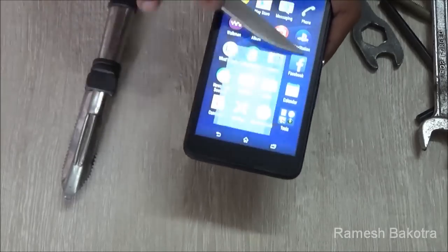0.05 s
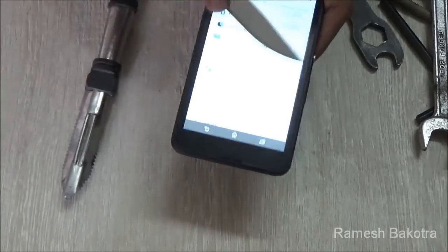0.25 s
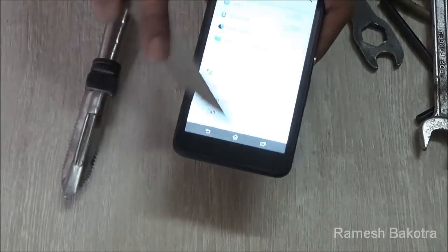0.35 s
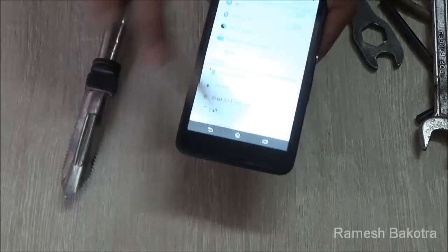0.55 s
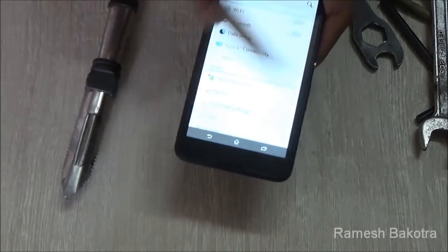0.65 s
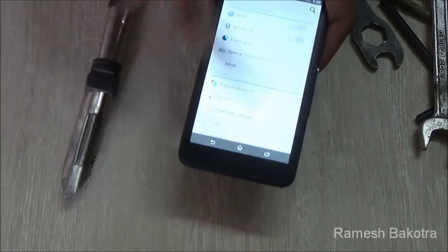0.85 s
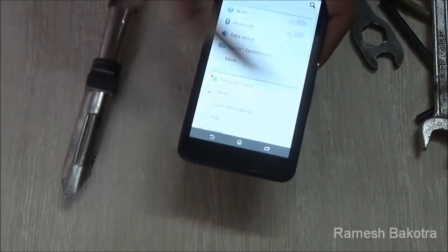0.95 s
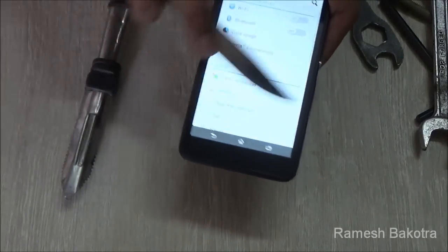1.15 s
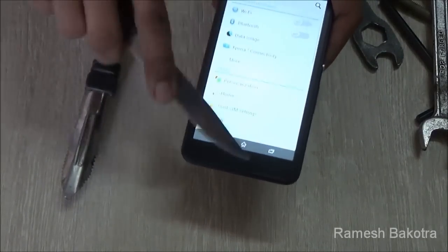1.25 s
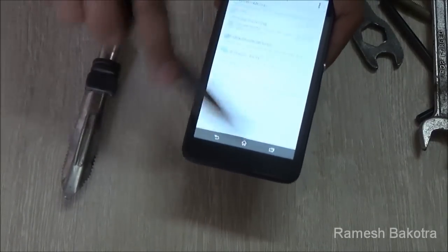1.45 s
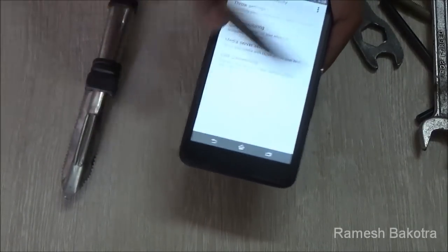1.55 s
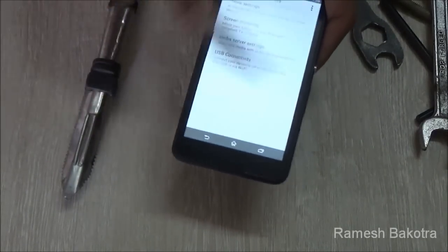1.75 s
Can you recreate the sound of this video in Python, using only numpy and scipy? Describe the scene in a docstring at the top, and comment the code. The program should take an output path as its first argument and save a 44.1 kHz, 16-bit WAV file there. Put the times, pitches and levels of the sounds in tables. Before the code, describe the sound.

A knife tip hits a phone's glass screen once with a sharp click, close to the microphone. Lighter ticks and short scuffs of blade and fingers follow, over soft background noise in a small, hard-walled room.

```python
"""A small hard room: close to the microphone, a knife tip strikes the glass of a hand-held phone once.
The contact cracks and crunches, and phone and blade ring briefly. Lighter ticks and short scuffs of
blade and fingers surround the blow; each has a quick, softer repeat, and the walls add a short tail.
Behind it lie soft room noise, a faint, wavering whine and two low hums that come and go."""
import sys
import numpy as np
from scipy import signal
from scipy.fft import rfft, irfft
from scipy.io import wavfile
from scipy.ndimage import uniform_filter1d

SR = 44100
rng = np.random.default_rng(int(sys.argv[2]) if len(sys.argv) > 2 else 0)


def inscribe(sig):
    """Save sig as 16-bit PCM at rate SR to the path in sys.argv[1].

    A 1-D sig is mono; a 2-D sig holds one channel per row.
    Samples are clipped to [-1, 1] before scaling.
    """
    pcm = np.round(np.clip(np.atleast_2d(sig).T, -1, 1) * 32767)
    wavfile.write(sys.argv[1], SR, pcm.astype(np.int16))


N = 79380

AIR_DB, WHINE_WAVER, HUM_WAVER = -59, 0.00513, 0.013  # wavers are fractions of the pitch
WALL_LAG_S, ROOM_HOLD_S, EARLY_FADE_S = .0098, .035, .005
REPEAT_LAG_S, REPEAT_DB = .0026, -9
SCUFF_GRAIN_DB, HANDLING_DB, HANDLING_SWING_DB = 5.5, -73, 5.5
TICK_RISE_S, TICK_RING_DB, TICK_RING_T60_S = 0.00027, -7.5, 0.021
BLOW_S, BLOW_DB = .2441, -9
CRACK_DB, CRUNCH_DB, CRUNCH_T60_S = 8.5, -16, .014  # crack relative to blow, crunch to crack
RING_SEND_DB, LIGHT_SEND_DB = -11, -11.5  # reverb sends


def undb(db):
    """Decibels to gain."""
    return 10 ** (np.asarray(db) / 20)


def unit(x):
    """Scale to rms 1."""
    return x / np.sqrt(np.mean(x ** 2))


def noise():
    """White noise."""
    return rng.standard_normal(N)


def drift(hz):
    """Smooth random motion with rms 1, mostly slower than hz."""
    width = int(SR / hz)
    smoothed = uniform_filter1d(noise(), width, mode="wrap")
    return unit(uniform_filter1d(smoothed, width, mode="wrap"))


def since(start):
    """Seconds since a moment, zero before it."""
    return np.maximum(np.arange(N) / SR - start, 0)


def decay(t, t60):
    """An envelope that falls 60 dB in t60 seconds."""
    return np.exp(-np.log(1000) * t / t60)


def delay(x, lag):
    """The same sound, lag seconds later."""
    return np.interp(np.arange(N) - round(lag * SR), np.arange(N), x, left=0)


def colour(x, points):
    """Minimum-phase EQ through (Hz, dB) points: nothing rings ahead of an attack."""
    hz, db = np.array(sorted(points), float).T
    freqs = np.maximum(np.arange(N + 1) * SR / (2 * N), 1)
    gain = undb(np.interp(np.log(freqs), np.log(hz), db))
    cepstrum = irfft(np.log(gain))
    cepstrum[1:N] *= 2
    cepstrum[N + 1:] = 0
    return irfft(rfft(x, 2 * N) * np.exp(rfft(cepstrum)))[:N]


def low_cut(x, hz=410):
    """Takes away the bass below about 410 Hz."""
    return signal.sosfilt(signal.butter(3, hz, "highpass", fs=SR, output="sos"), x)


def stereo(mid, side, side_db):
    """Left and right from mid and side; the top treble is nearly mono."""
    # EQ of the side signal (frequency [Hz], gain [dB])
    side_eq = [(100, -7), (2000, 3), (8000, 3), (13000, -13.5)]
    side = undb(side_db) * colour(side, side_eq)
    return np.array([mid + side, mid - side])


def wavering_phase(hz, waver):
    """The phase of a tone whose pitch wanders by the fraction waver."""
    return 2 * np.pi * np.cumsum(hz * (1 + waver * drift(25))) / SR


def room_noise():
    """A soft, steady bed of air, strongest in the mids."""
    # spectrum of the air (frequency [Hz], relative level [dB])
    air_eq = [(30, -32), (70, -19.5), (120, -17), (200, -11.5), (350, -8), (520, -9.5), (720, -4),
              (1000, -9.5), (1400, -6), (1900, -11.5), (3000, -14), (4500, -19.5), (6200, -24), (7500, -26),
              (10000, -27.5), (12500, -29), (16000, -30)]
    mid, side = (unit(colour(noise(), air_eq)) for _ in range(2))
    return undb(AIR_DB) * stereo(mid, side, side_db=-7.5)


def whine():
    """A faint wavering tone and its octave, as of a distant motor."""
    # course of the whine (time [s], pitch [Hz], fundamental level [dB], octave level [dB])
    course = [(0, 728, -70.5, -82), (.15, 725, -63.5, -93), (.55, 721.4, -68.5, -63),
              (0.719, 731, -61.5, -69.5), (.92, 730.7, -65.5, -62), (1.05, 727, -73, -71.5),
              (1.25, 738.4, -64, -84), (1.45, 720, -71.5, -75), (1.65, 742, -100, -77),
              (1.8, 741, -58, -69)]
    times, pitch, *levels = np.array(course).T
    t = since(0)
    phase = wavering_phase(np.interp(t, times, pitch), WHINE_WAVER)
    out = np.zeros(N)
    for harmonic, db in enumerate(levels, start=1):
        gain = undb(np.interp(t, times, db) + drift(30))  # flutters by about 1 dB
        out += np.sqrt(2) * gain * np.sin(harmonic * phase)
    return out


def hums():
    """Low tones far away that swell and fade."""
    # bell-shaped swells (peak time [s], half width [s], pitch [Hz], level [dB])
    swells = [(.4, .45, 402.8, -70.5), (1.19, 0.088, 246, -69)]
    out = np.zeros(N)
    for middle, width, hz, db in swells:
        swell = np.exp(-((since(0) - middle) / width) ** 2)
        out += np.sqrt(2) * undb(db) * swell * np.sin(wavering_phase(hz, HUM_WAVER))
    return out


def room_response():
    """A first wall echo, then dense reflections that hold briefly and die away band by band."""
    # reverb bands (centre [Hz], relative level [dB], t60 [s])
    bands = [(101, 8, 0.46), (350, 3.5, 0.27), (825, 7.5, 0.38), (1330, 1.5, 0.48), (2230, 0.5, 0.4),
             (3940, -0.5, .42), (6400, -1, 0.34), (9200, 0.5, 0.35), (15000, -2, 0.23)]
    t = since(WALL_LAG_S)
    fading = np.maximum(t - ROOM_HOLD_S, 0)
    freqs = np.maximum(np.arange(N // 2 + 1) * SR / N, 1)
    reflections = unit(noise() * undb(2 * np.tanh(drift(1500))))  # up to 2 dB of grain
    spectrum = rfft(reflections)
    log_centres = np.log([row[0] for row in bands])
    tail = np.zeros(N)
    for share, (_, db, t60) in zip(np.eye(len(bands)), bands):
        band = irfft(spectrum * np.interp(np.log(freqs), log_centres, share), N)
        tail += undb(db) * band * decay(fading, t60)
    early_boost = 1 + undb(4) * np.exp(-t / EARLY_FADE_S)
    return tail * early_boost * (t > 0) / np.sqrt(SR * .07)


def reverb(send):
    """The hard walls answer, with separate reflections for mid and side."""
    mid, side = (signal.fftconvolve(send, room_response())[:N] for _ in range(2))
    return stereo(mid, side, side_db=-10.5)


def quick_repeat(direct):
    """A softer repeat follows 2.6 ms after each contact."""
    # EQ of the repeat (frequency [Hz], gain [dB])
    repeat_eq = [(2500, -2), (8000, -4.5), (15000, 5)]
    return undb(REPEAT_DB) * colour(delay(direct, REPEAT_LAG_S), repeat_eq)


def scuffs():
    """Blade and fingers rub: grainy friction that swells and fades over a faint rustle of handling."""
    # rubs (start [s], time until faded to half [s], level [dB], tilt from 6 to 10 kHz [dB])
    rubs = [(0.027, 0.011, -49, 5.5), (0.158, 0.014, -57.5, 15), (0.444, 0.0087, -44.5, 18),
            (0.4554, 0.0053, -39.5, 8.5), (0.516, 0.011, -57.5, -5), (0.619, 0.012, -48.5, 10.5),
            (0.737, 0.042, -63, -8), (0.8, 0.015, -56.5, 6), (0.826, 0.013, -58.5, -3),
            (0.885, 0.024, -60.5, 1), (0.94, 0.0086, -54, 1), (1.009, 0.011, -59, -2),
            (1.081, 0.016, -59.5, 1), (1.138, .02, -60.5, 3), (1.175, 0.012, -51, 6),
            (1.203, 0.0086, -55, 4), (1.245, 0.035, -60.5, 3.5), (1.383, 0.0037, -56.5, 1),
            (1.453, .006, -55.5, 1), (1.532, .018, -56, -1), (1.61, 0.011, -59.5, -7),
            (1.648, 0.009, -57, 0), (1.705, .03, -61, 5), (1.749, 0.042, -68, -14)]
    # spectrum of the friction (frequency [Hz], relative level [dB])
    friction_eq = [(300, -19), (1500, -5.5), (4200, 0.5), (5400, 1), (6100, 6.5), (6900, -7.5), (8500, -1),
                   (10200, -4.5), (12500, -14.5), (16000, -21.5)]
    grains = noise() * undb(SCUFF_GRAIN_DB * np.tanh(drift(590)))
    friction = unit(colour(grains, friction_eq))
    out = friction * undb(HANDLING_DB + HANDLING_SWING_DB * np.tanh(drift(30)))
    for start, length, db, tilt_db in rubs:
        swell = np.interp(since(start) / length, [0, 0.31, 1, 2], [0.0044, 0.97, 0.51, 0.0067])
        out += undb(db) * colour(friction * swell, [(6000, -tilt_db / 2), (10000, tilt_db / 2)])
    return out


def ticks():
    """Light contacts: a tiny burst and two short rings that depend on the spot touched."""
    # EQ points of the bursts (frequency [Hz])
    eq_hz = [1200, 2780, 5800, 9470]
    # touches (time [s], level [dB], burst t60 [s], low ring [Hz], high ring [Hz], gains at eq_hz [dB])
    touches = [(0.018, -27.5, 0.017, 1410, 5900, 4, 4, 0.5, -1.5),
               (0.4185, -33.5, 0.0075, 4460, 9400, 1, 4, 8.5, -10),
               (.4270, -30, 0.02, 2050, 10500, 4, 8, -4, 4.5),
               (0.5616, -30, 0.024, 3200, 6600, -4, -4.5, 2, 2),
               (0.614, -43, 0.014, 9600, 10600, -6, -12, -2, 10.5),
               (0.993, -45.5, 0.032, 5700, 8400, -8, 0, 6, 4.5),
               (1.1327, -36, 0.013, 3130, 6030, -9, 0, 5.5, 2),
               (1.3636, -45.5, 0.031, 4870, 6140, -8, -8, 3, 1.5),
               (1.6629, -42, .016, 3220, 5700, -10, -3, 4, 2.5)]
    out = np.zeros(N)
    for start, db, t60, low_hz, high_hz, *eq_db in touches:
        t = since(start)
        attack = 1 - np.exp(-t / TICK_RISE_S)
        burst_eq = [(40, -45), (150, eq_db[0] - 17), *zip(eq_hz, eq_db), (14000, eq_db[-1] - 21.5)]
        burst = colour(noise() * attack * decay(t, t60), burst_eq)
        tones = sum(np.sin(2 * np.pi * hz * t) for hz in (low_hz, high_hz))
        rings = low_cut(tones * attack * decay(t, TICK_RING_T60_S))
        out += undb(db) * (burst + undb(TICK_RING_DB) * rings)
    return out


def glass_ring():
    """Phone and blade ring after the blow; neighbouring modes swing in opposite directions."""
    # modes of phone and blade (frequency [Hz], relative level [dB], t60 [s])
    modes = [(604.4, -24, 0.024), (837, -18, 0.051), (1650, -13, 0.012), (1976, -7, 0.026),
             (2303, -8.5, 0.018), (2761, -18.5, 0.038), (3880, -18, 0.037), (4430, -11.5, 0.014),
             (5800, -15, 0.014), (6400, -14, 0.011), (8190, -6.5, 0.0085), (8500, -23, 0.005),
             (10100, -20, 0.014), (14500, -36, .008)]
    t = since(BLOW_S)
    ring = sum((-1) ** k * undb(db) * np.cos(2 * np.pi * hz * t) * decay(t, t60)
               for k, (hz, db, t60) in enumerate(modes))
    return low_cut(ring * (t > 0))


def knife_blow():
    """The tip lands with a crack and a crunch; the glass rings. Gives direct sound and reverb send."""
    # spectrum of the contact (frequency [Hz], relative level [dB])
    contact_eq = [(60, -33), (200, -19), (450, -7.5), (800, 0.5), (1200, -2), (2100, 8), (3100, 2),
                  (4200, 3), (5100, -0.5), (6100, 3), (7200, 1), (8500, 0.5), (9600, -4), (10600, 0),
                  (12000, -12), (14800, -15), (16000, -25)]
    t = since(BLOW_S)
    impulse = delay(signal.unit_impulse(N), BLOW_S)
    grit = undb(CRUNCH_DB) * noise() * (t > 0) * decay(t, CRUNCH_T60_S)
    crack, crunch = (undb(BLOW_DB + CRACK_DB) * colour(x, contact_eq) for x in (impulse, grit))
    glass = undb(BLOW_DB) * glass_ring()
    return crack + crunch + glass, crack + undb(RING_SEND_DB) * glass


def scene():
    """The close contacts and their quick repeat, set in the room over its quiet background."""
    blow, blow_send = knife_blow()
    light_contacts = ticks() + scuffs()
    direct = blow + light_contacts
    near = direct + quick_repeat(direct)
    foreground = stereo(near, delay(near, 0.00019), side_db=-22.5)  # a hint of width
    tail = reverb(blow_send + undb(LIGHT_SEND_DB) * light_contacts)
    return foreground + tail + whine() + room_noise() + hums()


def record(dry):
    """The recorder cuts the top steeply at 15.9 kHz."""
    return signal.sosfilt(signal.ellip(10, .2, 80, 15900, fs=SR, output="sos"), dry)


dry = scene()
out = record(dry)
inscribe(out)
```